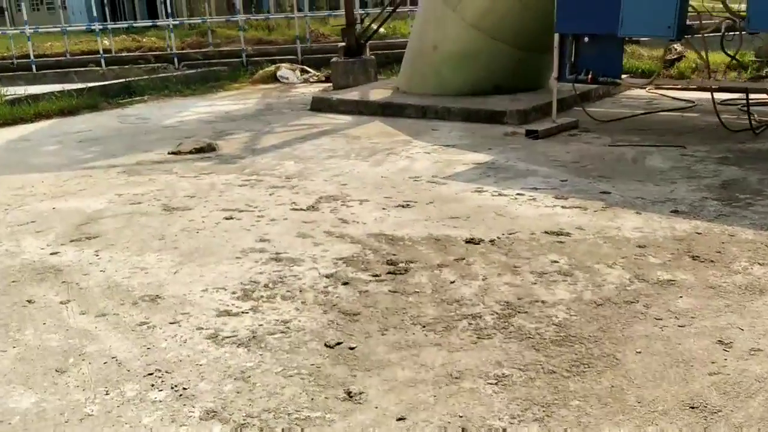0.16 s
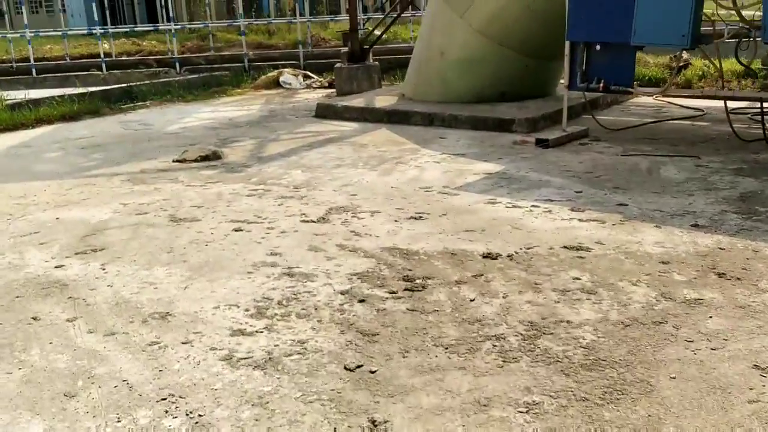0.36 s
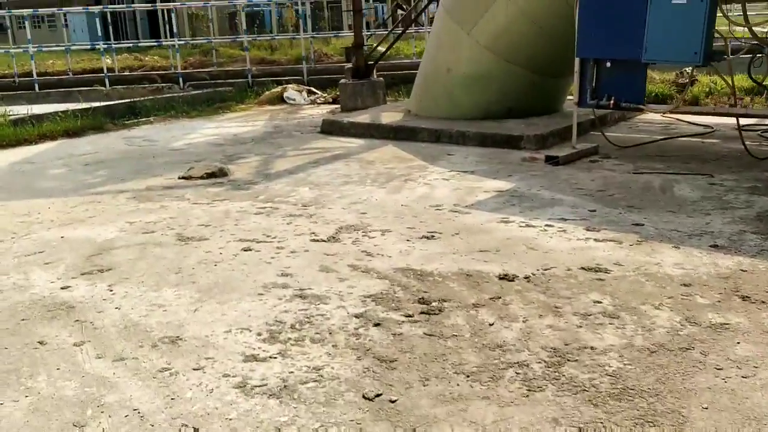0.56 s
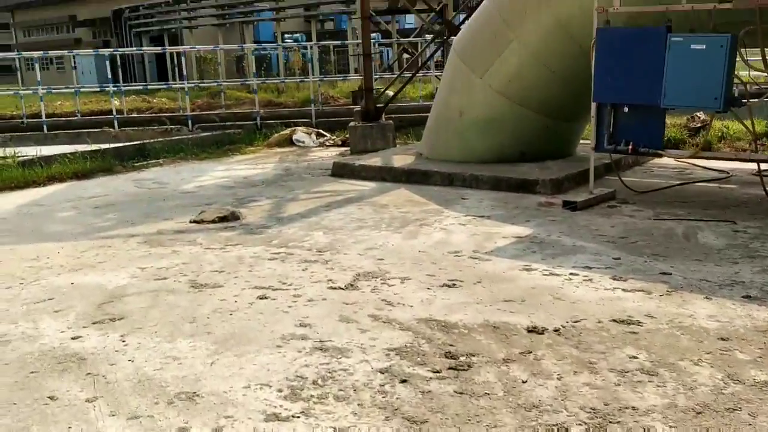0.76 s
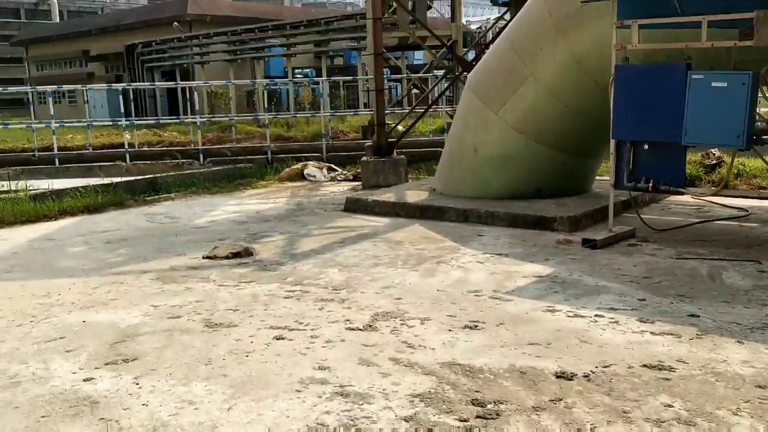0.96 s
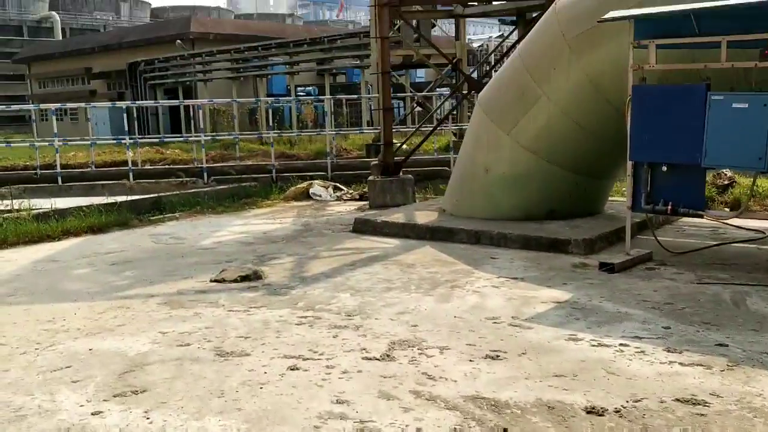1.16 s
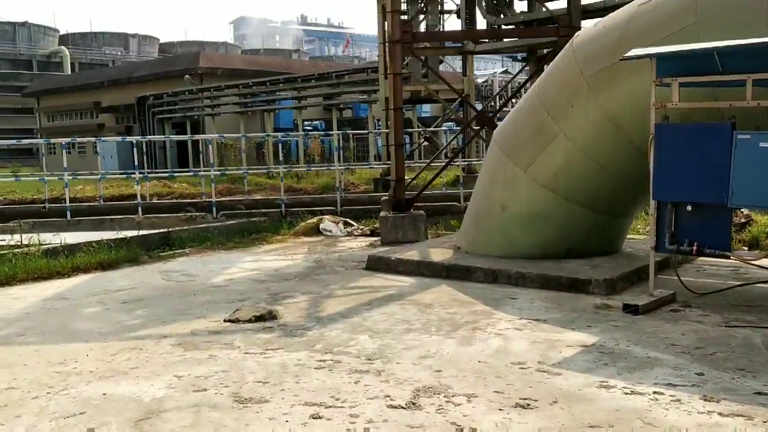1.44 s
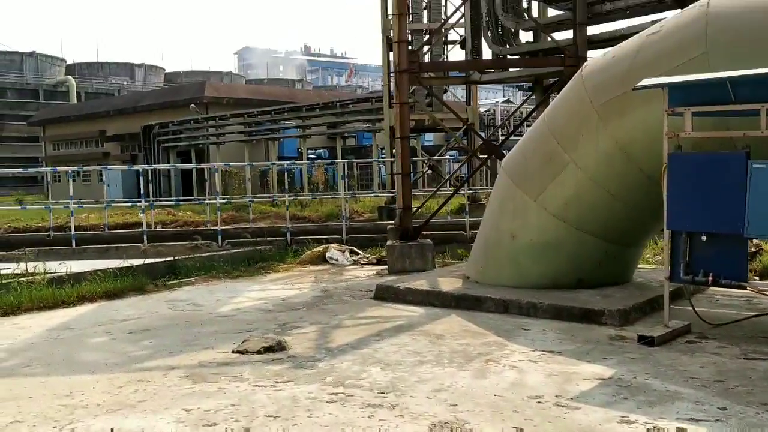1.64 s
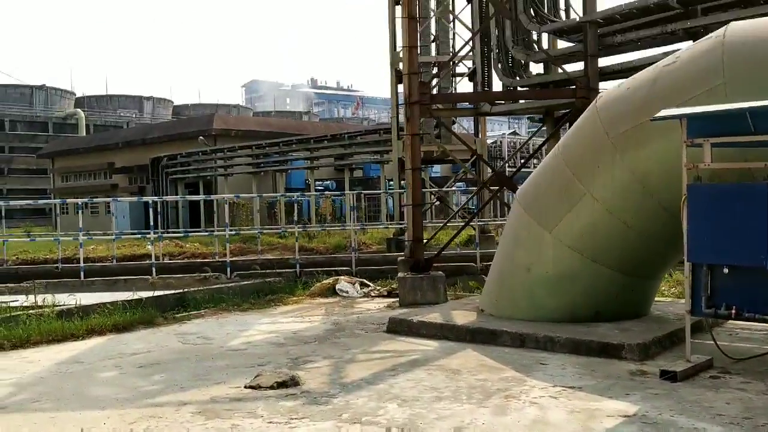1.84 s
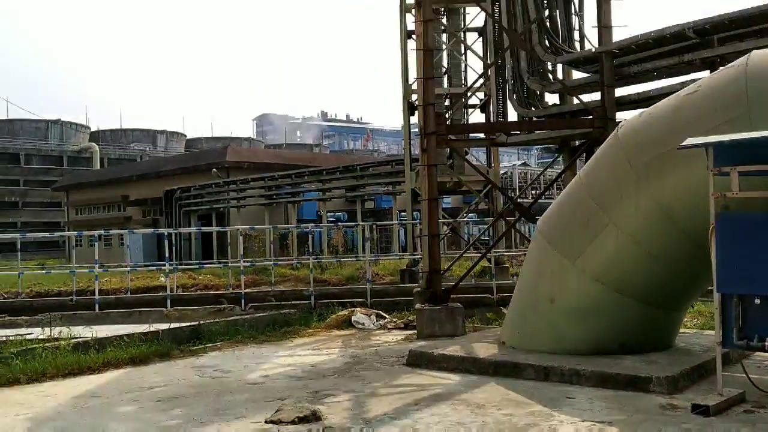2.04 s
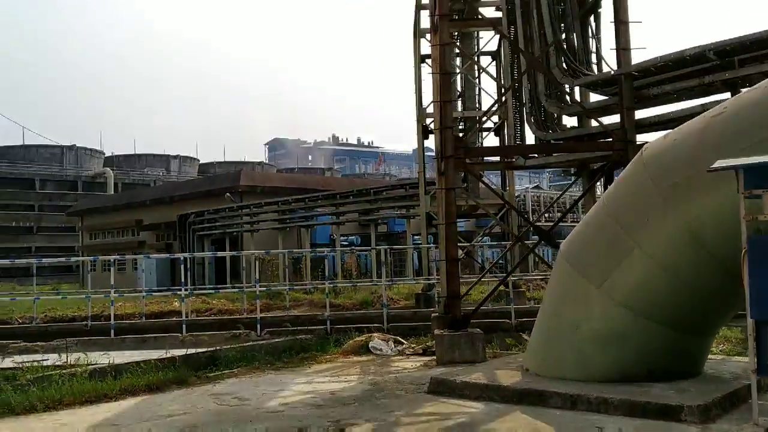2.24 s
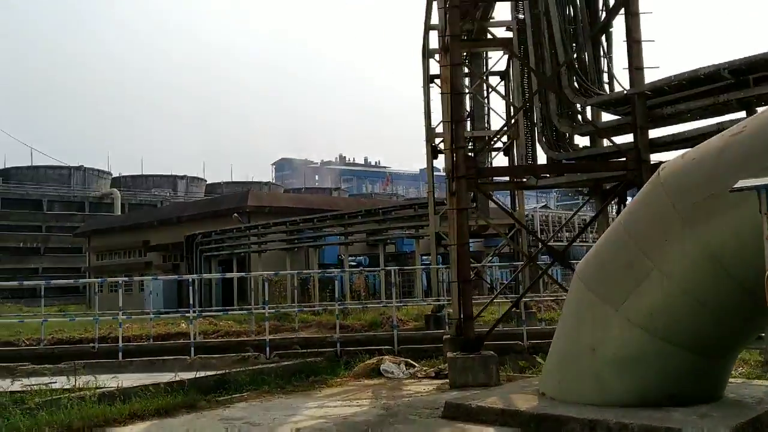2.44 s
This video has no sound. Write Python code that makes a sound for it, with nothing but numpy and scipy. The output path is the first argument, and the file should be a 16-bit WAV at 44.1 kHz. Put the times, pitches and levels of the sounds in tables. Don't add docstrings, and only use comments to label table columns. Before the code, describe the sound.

Steady dense roar of industrial cooling fans and falling water across an open plant yard

```python
import sys
import numpy as np
from scipy import signal
from scipy.fft import rfft, irfft, next_fast_len
from scipy.io import wavfile
from scipy.ndimage import uniform_filter1d, map_coordinates

SR = 44100
rng = np.random.default_rng(int(sys.argv[2]) if len(sys.argv) > 2 else 0)


def amplitude_ratio(level_db):
    exponent = np.asarray(level_db, float) / 20
    return 10 ** exponent


def transcribe(u):
    v = np.clip(np.atleast_2d(u).T, -1, 1)
    q = np.round(v * 32767).astype(np.int16)
    wavfile.write(sys.argv[1], SR, q)


N = 114219

# time in seconds, facing the towers from 0 to 1, breeze on the ports in dB.
TURN = [
    (0, 1, -63),
    (.5, 0.5, -45),
    (.9, 0.7, -45),
    (1.15, 0.47, -42.5),
    (1.45, .3, -37),
    (1.8, 0, -39),
    (2.1, 0.5, -46.5),
    (2.59, 0.04, -39),
]


def unit(x):
    return x / np.sqrt(np.mean(x ** 2) + 1e-20)


def along(points, hz):
    point_hz, point_db = np.transpose(points)
    return np.interp(np.log(hz + 1), np.log(point_hz + 1), point_db)


def curves(rows):
    seconds, *columns = np.transpose(rows)
    return [np.interp(np.arange(N) / SR, seconds, column) for column in columns]


def wobble(rate):
    return map_coordinates(rng.standard_normal(400), [np.arange(N) * rate / SR])


def filtered(x, response):
    size = next_fast_len(N + 8192)
    spectrum = rfft(x, size) * response(np.fft.rfftfreq(size, 1 / SR))
    return irfft(spectrum, size)[..., :N]


def patchy(patchy_db):
    z = signal.stft(rng.standard_normal((2, N + 512)), nperseg=512)[2]
    field = uniform_filter1d(rng.standard_normal(z.shape[1:]), size=8, axis=0)
    field = uniform_filter1d(field, size=12, axis=1)
    return signal.istft(z * amplitude_ratio(patchy_db * unit(field)), nperseg=512)[1][:, :N]


def yard(pair, travel_s, ground_share):
    own_share, own_below_hz = 0.13, 23
    bearing = np.linspace(0, np.pi / 2, 24)[:, None]

    def coherence(hz):
        along_ground = np.cos(2 * np.pi * hz * travel_s * np.cos(bearing)).mean(0)
        all_round = np.sinc(2 * hz * travel_s)
        shared = 1 - own_share / (1 + (hz / own_below_hz) ** 2)
        return shared * ((1 - ground_share) * all_round + ground_share * along_ground)

    def mixing(hz):
        c = coherence(hz)
        return np.array([c, np.sqrt(np.abs(1 - c ** 2))])

    return np.array([pair[0], filtered(pair, mixing).sum(0)])


def breeze():
    # frequency in Hz, level in dB per Hz.
    wind_tilt = [(12, -30), (22, 2), (35, 0), (60, -9), (110, -14), (250, -39), (500, -120)]
    _, level_db = curves(TURN)
    push = unit(filtered(rng.standard_normal(N), lambda f: amplitude_ratio(along(wind_tilt, f))))
    return amplitude_ratio(level_db) * push * [[1], [-1]]


def pump():
    # time in seconds, level in dB.
    whine_fade = [(0, -49.5), (.5, -49), (.62, -53.5), (.9, -52), (1.05, -51), (1.3, -69), (2.59, -68)]
    # time in seconds, level in dB.
    partial_fade = [(0, -69), (.14, -72), (.2, -52), (.3, -51), (.36, -65), (.45, -60), (.8, -59),
                    (1.2, -68), (2.59, -73)]
    # frequency in Hz, width in Hz, level in dB.
    gear_tones = [
        (366, 18, -57.5),
        (4600, 30, -96),
        (6150, 30, -91),
    ]
    whine_hz, partial_hz, left_lead = 573.8, 636, 0.6
    whine_db, = curves(whine_fade)
    partial_db, = curves(partial_fade)
    phase = 2 * np.pi * whine_hz * np.arange(N) / SR + 0.25 * wobble(12)
    whine = [amplitude_ratio(whine_db + 3 + 1.4 * wobble(12)) * np.sin(phase + lead) for lead in (left_lead, 0)]
    partial = amplitude_ratio(partial_db + 1.8 * wobble(8.3)) * np.sin(phase * partial_hz / whine_hz)
    sound = np.array(whine) + partial
    for hz, width_hz, tone_db in gear_tones:
        noise = rng.standard_normal((2, N))
        band = filtered(noise, lambda f: np.exp(-((f - hz) / width_hz) ** 2))
        sound = sound + amplitude_ratio(tone_db) * unit(band)
    return sound


def drops():
    drops_per_s, middle_hz, decay_cycles = 4000, 4570, 3.9
    when, pitch, size = rng.random((3, 2 * int(drops_per_s * N / SR), 1))
    hz = middle_hz * np.exp(1.6 * (pitch - .5))
    n = np.arange(96)
    ring = np.sin(2 * np.pi * hz * n / SR) * np.exp(-3 * n * hz / SR / decay_cycles)
    grain = amplitude_ratio(-3 * np.log(size + 0.011)) * ring
    at = (when * (2 * N - len(n))).astype(int) + n
    return unit(np.bincount(at.ravel(), grain.ravel(), 2 * N).reshape(2, N))


def water():
    # frequency in Hz, level in dB per Hz.
    fall_tilt = [(330, 1), (900, -2.5), (2600, 0.5), (2700, -1.5), (4300, 0), (6000, -6.5), (9200, -22.5),
                 (11500, -19)]
    fall_db, drops_db, ground_share = -33.5, -20.5, 0.85
    facing_travel_s, away_travel_s = 0.00081, 0.000778
    facing, _ = curves(TURN)
    pair = unit(patchy(patchy_db=0.3)) + amplitude_ratio(drops_db) * drops()
    toward = yard(pair, facing_travel_s, ground_share)
    away = yard(pair, away_travel_s, ground_share)
    fall = facing * toward + (1 - facing) * away
    swell_db = .12 * wobble(1.5) + .35 * wobble(8)
    return amplitude_ratio(fall_db + swell_db) * unit(filtered(fall, lambda f: amplitude_ratio(along(fall_tilt, f))))


def fans():
    # time in seconds, level in dB.
    rumble_levels = [(0.0, -37), (0.15, -33), (0.3, -35.5), (0.5, -33.5), (0.7, -35.5), (0.9, -34),
                     (1.1, -34.5), (1.3, -35), (1.6, -36), (1.85, -36.5), (2.08, -34), (2.25, -34.5),
                     (2.45, -34.5), (2.59, -35)]
    # frequency in Hz, level in dB per Hz.
    rumble_tilt = [(8.2, -41), (14, -23), (32, 4), (48, 4), (147, -7.5), (192, -8), (294, -23.5),
                   (370, -20), (420, -19), (550, -27), (920, -120)]
    # time in seconds, frequency in Hz, level in dB.
    blade_throb = [(0.0, 46.8, -40), (0.15, 50.3, -28), (0.3, 53.8, -33.5), (0.5, 53.5, -34),
                   (0.68, 54.9, -29.5), (0.78, 39.57, -50), (0.95, 39.03, -28.5), (1.15, 39.7, -32),
                   (1.3, 40.87, -42), (1.45, 40, -26.5), (1.65, 38.65, -31), (1.8, 35.36, -35.5),
                   (1.97, 34.4, -25), (2.08, 33.9, -34.5), (2.3, 32.94, -38), (2.45, 31.1, -28),
                   (2.59, 32.87, -37)]
    rumble_db, = curves(rumble_levels)
    throb_hz, throb_db = curves(blade_throb)
    field = yard(patchy(patchy_db=.5), travel_s=0.00092, ground_share=0.3)
    rumble = unit(filtered(field, lambda f: amplitude_ratio(along(rumble_tilt, f))))
    throb_level = np.sqrt(2) * amplitude_ratio(throb_db - 5 + 3.3 * wobble(8.8))
    throb = throb_level * np.sin(2 * np.pi * np.cumsum(throb_hz) / SR)
    return amplitude_ratio(rumble_db + 1.5) * rumble + throb


def scene():
    return breeze() + pump() + water() + fans()


def ports(dry):
    # frequency in Hz, width in Hz, lift in dB.
    cavity_rings = [
        (1692, 728, 9),
        (4080, 1500, 2.5),
        (7400, 1800, 4),
    ]
    # frequency in Hz, level in dB.
    left_shade = [(300, 1), (1000, 1), (3000, -3), (5600, -5), (9000, 0)]
    low_cut_hz, top_hz, top_sag_db = 13.8, 13085, -2.5

    def response(f):
        left_db = along(left_shade, f)
        for hz, width_hz, lift_db in cavity_rings:
            left_db = left_db + lift_db * np.exp(-((f - hz) / width_hz) ** 2)
        low_cut = f ** 2 / (f ** 2 + low_cut_hz ** 2)
        top = amplitude_ratio(top_sag_db * np.clip((f - 12000) / 600, 0, 1)) * (f < top_hz)
        return low_cut * top * np.array([amplitude_ratio(left_db), np.ones_like(f)])

    return filtered(dry, response)


def fade_patches(pair):
    # frequency in Hz, gain in dB.
    gate_depth = [(600, -3), (1500, 0), (1900, -3), (2300, -12), (2700, -32), (7000, -30), (9000, -17),
                  (13000, -16)]
    top_off = [
        [.15],
        [1.1],
    ]
    threshold, softness, top_band_hz = 0.5, 0.08, 12450
    frame = dict(nperseg=2048, noverlap=1536)
    hz, _, z = signal.stft([pair[0] + pair[1], pair[0] - pair[1]], SR, **frame)
    chance = rng.standard_normal(z.shape)
    for _ in range(2):
        chance = uniform_filter1d(uniform_filter1d(chance, size=3, axis=1), size=4, axis=2)
    shut = 1 / (1 + np.exp((threshold - unit(chance)) / softness))
    gate = amplitude_ratio(shut * along(gate_depth, hz)[:, None])
    top_on = unit(uniform_filter1d(rng.standard_normal(z[:, 0].shape), size=3)) < top_off
    kept = np.where(hz[:, None] > top_band_hz, top_on[:, None], 1)
    mid, side = signal.istft(z * kept * gate, SR, **frame)[1][:, :N]
    return np.array([mid + side, mid - side]) / 2


def top_cut(x):
    return signal.sosfilt(signal.butter(12, 13095, fs=SR, output="sos"), x)


def record(dry):
    mix = fade_patches(ports(dry))
    return top_cut(mix)


dry = scene()
out = record(dry)
transcribe(out)
```